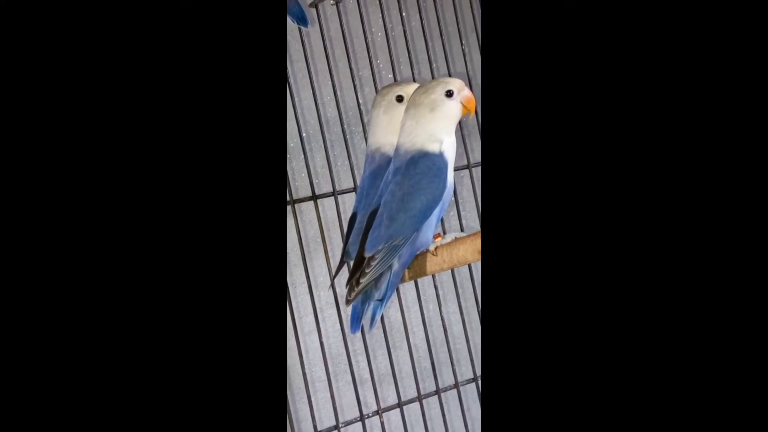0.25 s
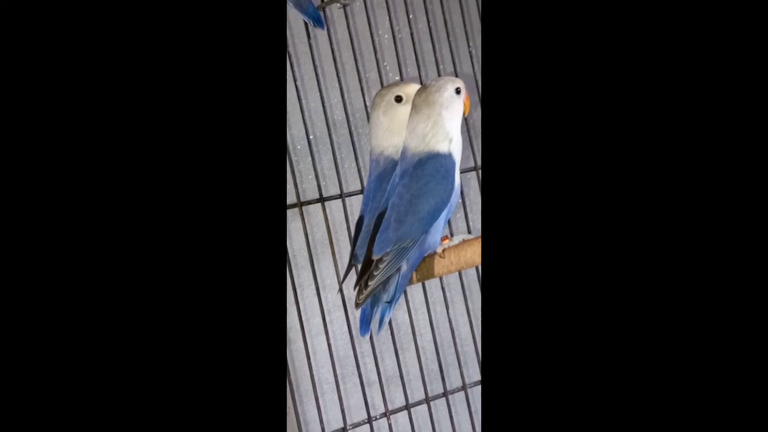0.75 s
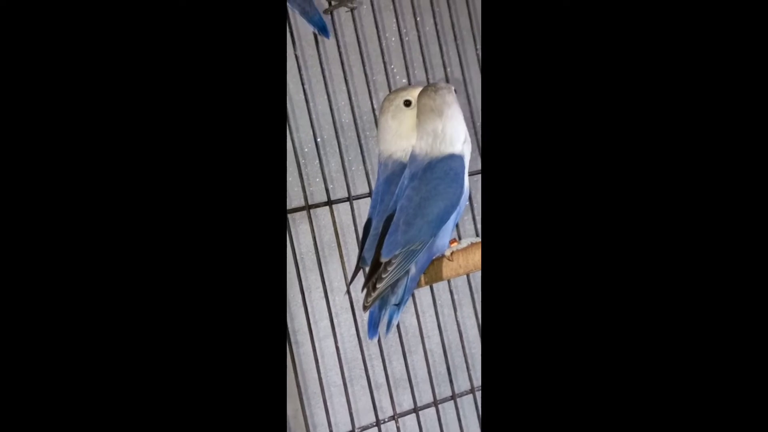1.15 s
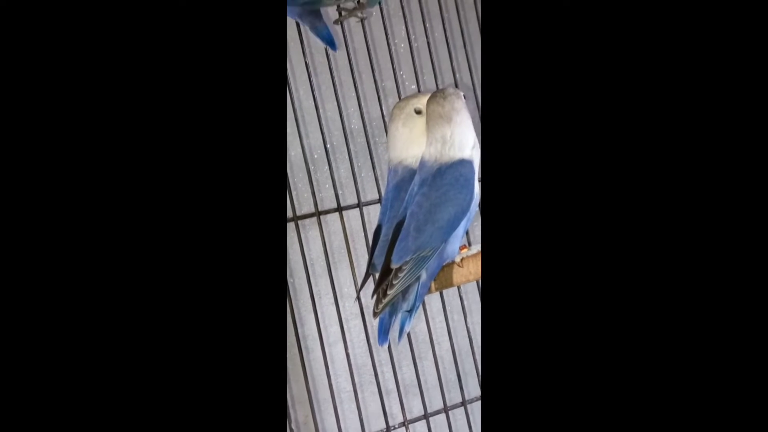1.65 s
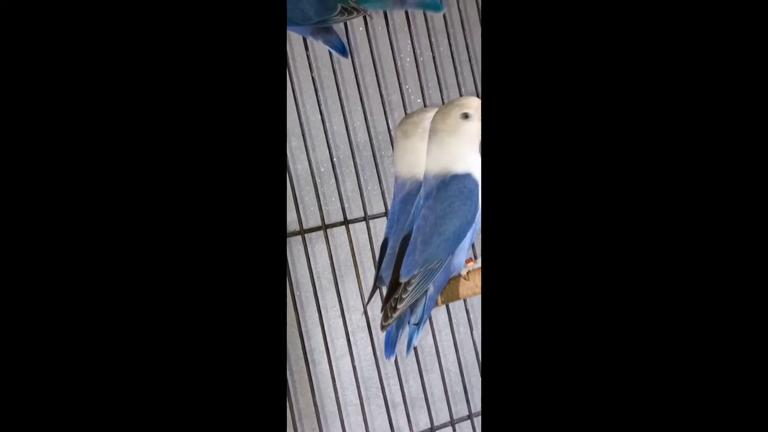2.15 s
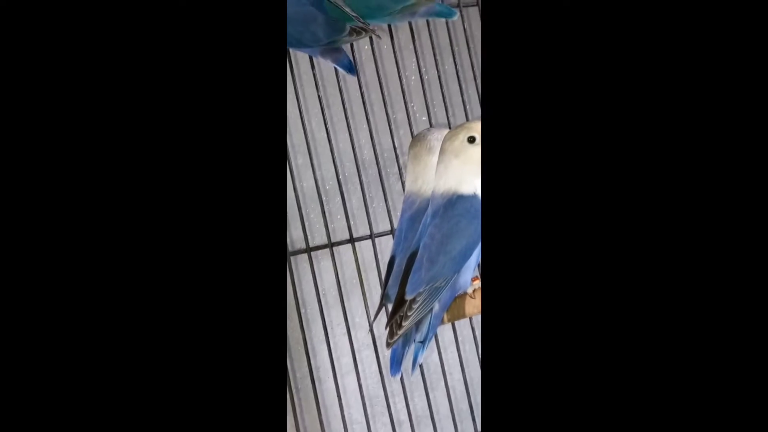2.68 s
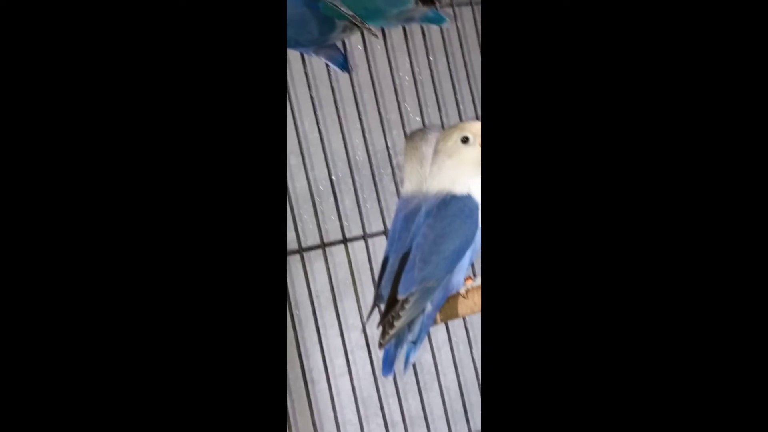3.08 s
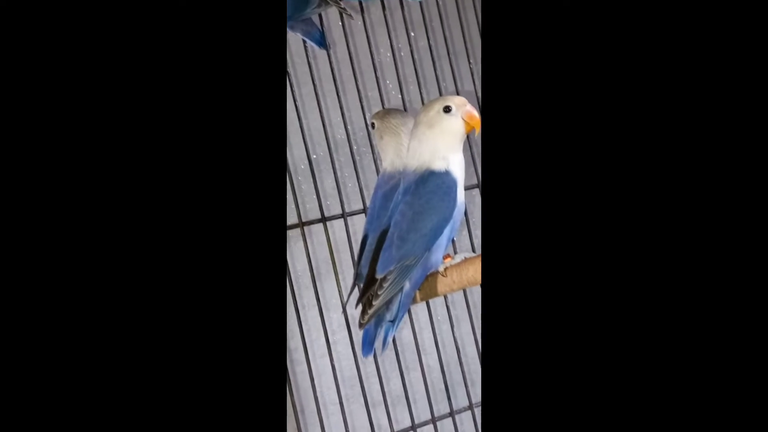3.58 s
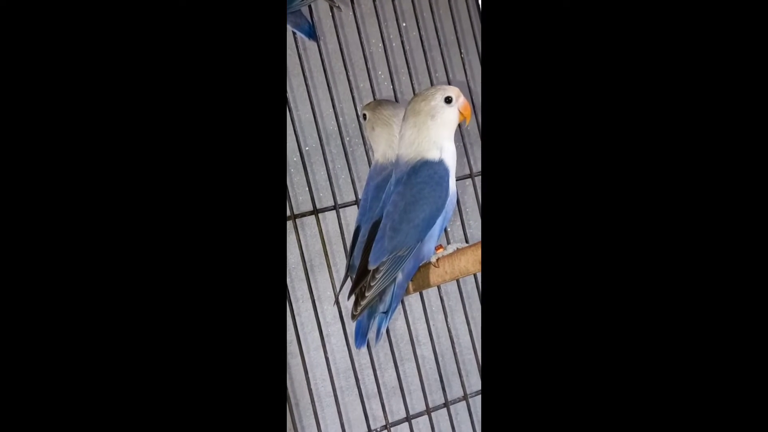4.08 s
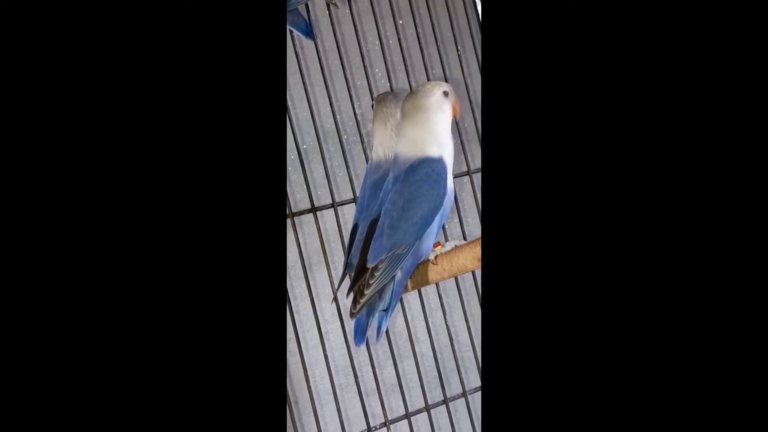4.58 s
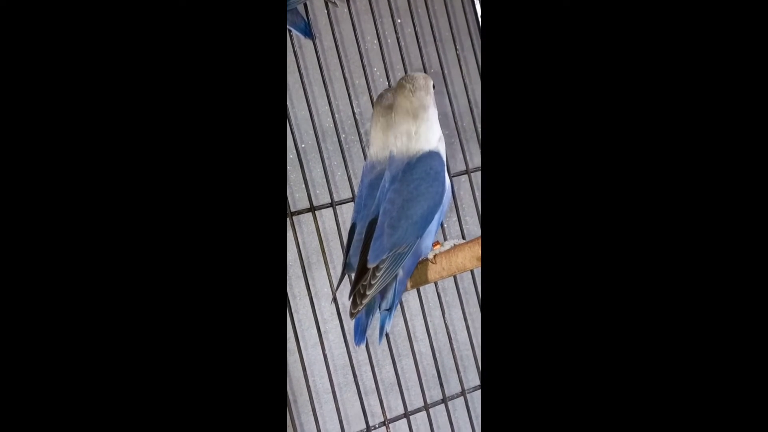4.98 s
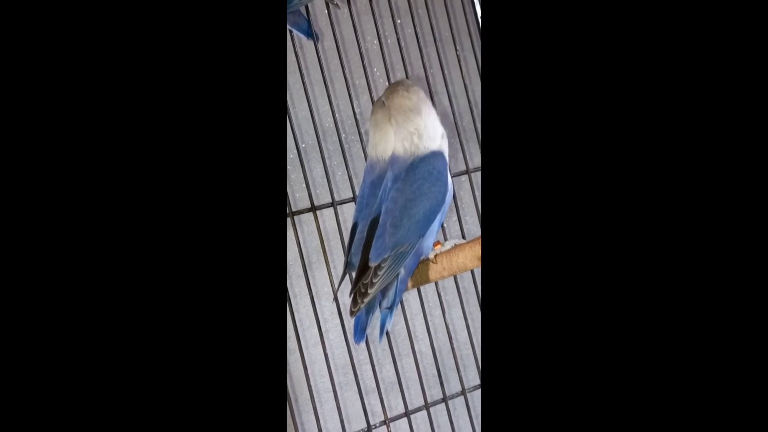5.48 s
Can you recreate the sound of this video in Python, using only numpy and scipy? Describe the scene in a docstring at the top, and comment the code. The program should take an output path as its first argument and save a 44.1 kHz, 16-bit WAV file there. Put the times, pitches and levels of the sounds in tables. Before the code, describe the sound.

Heard close up in a small, slightly echoing room, caged lovebirds let out a few separate piercing chirps. Then wings flap and claws click on the ringing wire while the birds squawk. They move into a rapid stream of high, raspy syllables dotted with whistled squeaks, which grows a little quieter near the end. A faint low hum lies underneath.

```python
"""A small hard room, close to a wire cage of lovebirds.
Three sharp chirps, squawks amid fluttering wings and claws on the bars, then a fast chatter that
turns harsh and eases off. A bird's voice box buzzes, mostly near 2.2 kHz, and its beak and windpipe
shape the tone; in a chirp the voice flips up into a piercing whistle. Tapped wires ring, feathers
rustle, wings push air, and the walls echo over a faint hum."""
import sys
import numpy as np
from scipy import signal
from scipy.fft import rfft, irfft, next_fast_len
from scipy.io import wavfile

SR = 44100
rng = np.random.default_rng(int(sys.argv[2]) if len(sys.argv) > 2 else 0)


def put_to_file(sound):
    """Save the sound as 16-bit audio at rate SR, in the file named by the first command-line argument."""
    columns = np.atleast_2d(sound).T  # one column per channel
    safe = np.clip(columns, -1, 1)
    whole_steps = np.round(safe * 32767)
    wavfile.write(sys.argv[1], SR, whole_steps.astype(np.int16))


N = 252693
TOP_HZ = 15550  # upper limit of the sound

# Levels are relative. Pan is left minus right. Roughness 0 is a clean tone, near 1 a harsh one.
# syllables of the chatter: (time [s], length [s], level [dB], pitch [Hz], brightness [dB], pan [dB])
SYLLABLES = [(3.388, 0.038, -26.5, 2127, -11, -1), (3.466, 0.029, -23, 2128, -8.5, -7),
             (3.546, 0.028, -16, 2349, -10, -1), (3.621, 0.032, -24.5, 2185, -8.5, 2),
             (3.698, 0.049, -24.5, 2215, -11, -0.5), (3.751, 0.057, -16.5, 2073, -10.5, -6),
             (3.817, 0.07, -18, 2159, -7, -7), (3.879, 0.039, -22.5, 2138, -3, -1),
             (3.93, 0.063, -18.5, 2178, -6, -3.5), (4.011, 0.047, -17, 2210, -5.5, -1.5),
             (4.088, 0.072, -19, 2144, -8.5, -5.5), (4.174, 0.041, -21, 2212, -6.5, -4),
             (4.222, 0.027, -18, 2108, -10, -4), (4.26, 0.028, -21, 2268, -7.5, -4),
             (4.293, 0.029, -20.5, 2057, -6.5, 2), (4.342, 0.049, -24, 2150, -9, -4),
             (4.388, 0.043, -19.5, 2170, -9, -3), (4.452, 0.062, -20, 2207, -8.5, -6),
             (4.548, 0.037, -17, 2233, -11, -11), (4.578, 0.058, -18.5, 2220, -11.5, -21),
             (4.654, 0.032, -20.5, 2159, -8.5, -8), (4.692, 0.028, -24, 2860, -3, -7),
             (4.74, 0.029, -22, 2090, -9.5, -1), (4.793, 0.033, -24.5, 2190, -9, -5),
             (4.828, 0.0485, -25.5, 2263, -10.5, -7), (4.881, 0.03, -27.5, 2220, -5, -6),
             (4.925, 0.048, -23.5, 2283, -9.5, -2), (4.982, 0.035, -27, 2198, -14, -2),
             (5.052, 0.05, -25, 2323, -11.5, -3), (5.143, 0.035, -26.5, 2265, -8, 0),
             (5.197, 0.061, -25, 2190, -8.5, 2), (5.269, 0.026, -27, 2257, -11, -6),
             (5.301, 0.036, -23.5, 2300, -6, -1), (5.351, 0.027, -26, 2244, -15, -7),
             (5.399, 0.037, -22, 2260, -7.5, -7), (5.544, 0.063, -26, 2306, -11.5, -5),
             (5.637, 0.015, -46, 2340, -30, -9), (5.669, 0.018, -37.5, 1835, -32, 1)]
# the chatter's changing tone: (time [s], roughness, beak resonance [Hz], lowest harmonic [dB])
CHATTER_TONE = [(3.4, 0.41, 5100, -5), (3.549, 0.42, 7050, -9), (3.69, 0.48, 6700, -8),
                (3.754, 0.61, 4300, -15), (3.88, 0.67, 5100, -11.5), (4.62, 0.64, 4830, -13),
                (4.791, 0.56, 4750, -10.5), (4.849, 0.31, 6700, -8.5), (5.0, 0.33, 4030, -12),
                (5.22, 0.7, 3800, -13.5), (5.34, 0.45, 4900, -14), (5.57, 0.7, 4270, -10.5)]
# single squawks: (time [s], length [s], level [dB], pitch [Hz], roughness, brightness [dB],
# lowest harmonic [dB], beak resonance [Hz], pan [dB])
SQUAWKS = [(0.347, 0.011, -23, 1983, 0.61, -5.5, -7, 4300, 5),
           (1.026, 0.019, -24.5, 2120, 0.66, 6, -4.5, 4600, 1.5),
           (1.047, 0.028, -29.5, 2654, 0.94, -12, -10, 5300, -7),
           (1.278, 0.065, -36, 3550, 0.78, 4, 9.5, 7000, -3.5),
           (1.326, 0.027, -28.5, 2090, 0.85, -8, -7, 4900, -4.5),
           (2.424, 0.018, -24, 2368, 0.59, -9.5, -8.5, 7200, -5),
           (2.439, 0.033, -28, 2420, 0.88, -5, 0.5, 4640, -5),
           (2.608, 0.05, -34, 2270, 0.93, -9, -2.5, 4500, -3),
           (2.68, 0.026, -25.5, 2360, 1.17, -6.5, -1.5, 4270, -3),
           (2.825, 0.052, -25.5, 2794, 0.62, -6.5, -3.5, 5460, 1),
           (2.928, 0.0743, -29, 2826, 0.79, -5.5, 3, 5400, -5),
           (3.022, 0.041, -21, 3350, 0.76, -4, 5, 5400, -4),
           (3.094, 0.032, -21.5, 3500, 0.75, -2, 5.5, 6150, -5),
           (3.292, 0.031, -27, 2570, 0.65, -15.5, -8.5, 5300, -14)]
# whistled chirps, and brief squeaky peaks within the chatter: (time [s], length [s], level [dB],
# pitch [Hz], glide [octaves], roughness, overtone [dB], pan [dB], echo [dB])
CHIRPS_AND_SQUEAKS = [(0.3539, 0.0062, -11, 4310, 0.084, 0.17, -13.5, -12, -10),
                      (0.356, 0.012, -19, 5940, 0.04, 0.21, -4.5, -6, -3.5),
                      (0.3632, 0.013, -14, 5550, -0.17, 0.3, -11, -10, -10),
                      (1.0354, 0.0075, -17, 4660, 0.07, 0.42, -19, -10, 0.5),
                      (1.04, 0.033, -20.5, 6300, -0.0035, 0.3, -8.5, -1.5, -2.5),
                      (1.339, 0.038, -18, 6400, 0.084, 0.5, 0.5, -10, -8.5),
                      (2.831, 0.018, -30, 5590, 0.13, 0.1, -22, -4, 4),
                      (2.95, 0.013, -20.5, 5910, -0.124, 0.16, -19, -2, -3.5),
                      (2.971, 0.0152, -24, 5760, 0.04, 0.25, -26, -4, -0.5),
                      (3.162, 0.0263, -20, 6090, -0.16, 0.68, -10, 2, -0.5),
                      (3.168, 0.016, -18, 5065, 0.25, 0.2, -12, -2, 4.5),
                      (3.224, 0.033, -19.5, 5890, 0.1, 0.8, -16.5, -1, -0.5),
                      (3.93, 0.0142, -15, 4760, 0.14, 0.45, -17, -10, -10),
                      (4.043, 0.0078, -17, 4970, 0.27, 0.5, -21, -15, -14),
                      (4.046, 0.0154, -20.5, 6550, 0.031, 0.01, -8, 17, 1),
                      (4.181, 0.017, -18.5, 4800, -0.026, 0.5, -28, -22, -8),
                      (4.264, 0.0073, -14, 4810, -0.062, 0.06, -21, -21, -3),
                      (4.304, 0.0085, -13, 5030, 0.17, 0.4, -26, -22, -8),
                      (4.309, 0.03, -21.5, 6670, 0.01, 0.1, -9, 20, -2),
                      (4.832, 0.017, -15, 4530, 0.057, 0, -38, -8, -9),
                      (4.859, 0.019, -18.5, 4510, -0.014, 0, -44, -20, -1.5),
                      (4.923, 0.016, -24.5, 4480, -0.0061, 0.25, -32, -7, -11),
                      (4.951, 0.02, -21.5, 4560, -0.019, 0, -32, -22, -8),
                      (5.016, 0.0068, -23.5, 4480, -0.016, 0, -24, -11, -18),
                      (5.213, 0.015, -20.5, 4470, 0.018, 0.08, -16, -21, -6),
                      (5.232, 0.009, -19, 4457, -0.11, 0.24, -22, -21, -1),
                      (5.302, 0.0127, -21.5, 4480, 0, 0.12, -30, -12, 3),
                      (5.325, 0.01, -15.5, 4527, -0.03, 0.1, -38, -11, -2),
                      (5.416, 0.05, -21, 5560, -0.126, 1.08, -21, -6, -2.5),
                      (5.569, 0.013, -22.5, 4610, -0.13, 0.44, -32, -15, 2.5)]
# how beak and windpipe filter the voice: (frequency [Hz], gain [dB])
THROAT_SHAPE = [(700, -64.5), (1300, -23), (1700, -26), (2150, -35.5), (2600, -11), (3300, -7),
                (4400, -8.5), (5500, -2), (6700, -18.5), (7500, -18.5), (8600, -18), (9600, -25),
                (12000, 3.5), (15000, -17.5)]
# resonances of the windpipe: (frequency [Hz], width [Hz], gain [dB])
WINDPIPE_PEAKS = [(2135, 315, 16), (4140, 78, 2.5), (6470, 165, 2.5), (9930, 1080, 16.5), (13000, 820, 0),
                  (14200, 380, -5.5)]
# narrow resonances at the top of the voice: (frequency [Hz], width [Hz], level [dB])
SHRILL_PEAKS = [(9820, 330, -1.5), (11970, 300, 0), (14120, 330, -4.5)]
# low puffs of air with a few of the chirps: (time [s], length [s], level [dB], pan [dB])
PUFFS = [(1.034, 0.056, -37.5, 15), (4.043, 0.0365, -34, 26), (4.303, 0.0385, -30, 31),
         (5.42, 0.043, -48.5, 20)]
# claws and beaks hitting the bars: (time [s], level [dB])
TAPS = [(0.187, -42), (0.203, -48.5), (1.724, -40.5), (2.041, -42), (2.424, -35), (2.571, -29.5),
        (2.679, -29), (2.801, -25), (2.861, -23.5), (2.892, -33), (2.928, -23.5), (3.032, -23)]
# ringing tones of the wire: (frequency [Hz], width [Hz], level [dB])
WIRE_TONES = [(2744, 650, -4), (4200, 500, -1.5), (5140, 310, -5), (6000, 380, -11.5), (10950, 490, -7.5),
              (12700, 1500, -21)]
# strokes of preening: (time [s], length [s], level [dB])
PREEN_STROKES = [(0.18, 0.056, -47.5), (0.318, 0.035, -54), (1.794, 0.056, -56.5), (1.899, 0.034, -67),
                 (1.997, 0.084, -60), (2.204, 0.053, -62), (2.252, 0.055, -59.5)]
# the birds shuffle, flap and settle: (time [s], stirred air [dB], feather rustle [dB])
MOVEMENT = [(0, -45.5, -59.5), (0.32, -47, -56.5), (0.5, -45.5, -52.5), (0.9, -56, -75),
            (1.401, -50.5, -67.5), (1.678, -59, -67.5), (1.799, -51.5, -51), (2.36, -45, -59),
            (2.581, -41, -50.5), (2.8, -38.5, -41.5), (3.05, -33, -47.5), (3.45, -41.5, -48),
            (4.001, -50, -50.5), (5.73, -55, -60)]
# rustling feathers: (frequency [Hz], level [dB])
FEATHER_SPECTRUM = [(600, -2), (1500, 1.5), (3000, -4), (5000, -5.5), (8000, -15.5), (11500, -6.5),
                    (15000, -12)]
# air stirred by wings: (frequency [Hz], level [dB])
AIR_SPECTRUM = [(15, -77), (25, -50), (60, -2), (97, -10), (124, 5.5), (155, -9), (182, 4.5), (296, -8.5),
                (525, -8), (694, -18.5), (1600, -35), (2080, -51), (3520, -120)]
# how long the room rings: (frequency [Hz], time to fade by 60 dB [s])
ROOM_DECAY = [(200, 0.19), (1500, 0.75), (4000, 0.48), (7000, 0.38), (12000, 0.3)]
# the hum of the room at rest: (frequency [Hz], level [dB])
HUM_SPECTRUM = [(15, -81.5), (25, -59.5), (49, -18), (103, -30.5), (125, -14.5), (213, -29.5), (271, 6),
                (309, -7.5), (475, -1.5), (709, -37.5), (3180, -48.5), (4260, -44), (7090, -50.5),
                (8320, -42.5), (15000, -79)]
# how the microphone's two openings colour the sound: (frequency [Hz], left minus right [dB])
MIC_BALANCE = [(100, -2), (600, 0), (2000, 3.5), (4500, 0), (5600, -2.5), (7000, 14), (9000, 4),
               (10000, 0.5), (12000, -4), (13200, 1), (14300, 3.5)]


def buzzy_call(length, hz, rough, beak_hz, low_db, bright_db, rise_s,
               jitter=0.0607, rattle_hz=150, beak_db=4, beak_width_hz=800):
    """The voice box buzzes unevenly around a clean core; beak and windpipe shape the tone."""
    t = times(length)
    arch = np.sin(np.pi * t / length) - 2 / np.pi  # the pitch rises a little, then falls
    clean_phase = phase_of(hz * (1 + 0.036 * arch))
    phase = clean_phase + phase_of(hz * jitter * rough * wobble(len(t), 260))
    harmonics = range(1, int(TOP_HZ / hz) + 1)
    buzz = evened(sum(np.cos(k * phase + k * k) / (1 + (k * hz / 12000) ** 4) for k in harmonics))
    core = sum(np.cos(k * clean_phase + k * k) for k in harmonics)
    opening = 1 + np.cos(phase)  # air gets through once a cycle
    # a second vibration joins in between the first two harmonics
    growl = 0.085 * rough * wobble(len(t), 260) * np.cos(1.55 * phase) * opening
    # harsh calls hiss between the harmonics and fizz on top
    hiss = colour(wobble(len(t), SR) * opening,
                  lambda f: 20 * np.log10(rough ** 3 + rough / (1 + (8500 / (f + 100)) ** 8)))
    # they also break into an uneven rattle
    rattle = np.sin(phase_of(rattle_hz * (1 + 0.3 * wobble(len(t), 170))))
    bursts = np.exp(rough * (0.8 * np.tanh(wobble(len(t), 590)) + 0.3 * rattle))
    source = (buzz + growl + hiss) * bursts + 0.5 * max(1 - rough, 0.15) * np.sqrt(bursts) * core
    voice = colour(source, lambda f: throat_db(f) + beak_db * bell(f, beak_hz, beak_width_hz))
    # split the voice into three bands and set the level of each
    low = colour(voice, lambda f: -20 * np.log10(1 + (f / (1.582 * hz)) ** 20))
    high = colour(voice, lambda f: -20 * np.log10(1 + (8300 / (f + 100)) ** 20))
    middle = voice - low - high
    ring = evened(shrill_ring(arch) * bursts)
    ring_share = np.interp(rough, [0.35, 0.75], [0.85, 0.16])  # clear calls ring more
    top = np.sqrt(1 - ring_share) * evened(high) + np.sqrt(ring_share) * ring
    voice = evened(middle) + gain_of(low_db) * evened(low) + gain_of(bright_db) * top
    return evened(voice * swell(t, rise_s, fall_s=0.006))


def throat_db(hz):
    """Beak and windpipe boost some frequencies and weaken others."""
    peaks = sum(db * bell(hz, centre, width) for centre, width, db in WINDPIPE_PEAKS)
    return look_up(THROAT_SHAPE, hz) + peaks


def shrill_ring(arch, drift=0.009, lift=0.015):
    """Air rings the top resonances, which differ a little in each call and rise as the beak opens."""
    tuning = 1 + drift * rng.standard_normal() + lift * arch
    rings = 0
    for hz, width, db in SHRILL_PEAKS:
        phase = phase_of(hz * tuning)
        noise = rng.standard_normal((2, 16384))[:, :len(arch)]
        breath = low_pass(noise, width / 2, steepness=4)
        rings += gain_of(db) * evened(breath[0] * np.cos(phase) + breath[1] * np.sin(phase))
    return evened(rings)


def chatter(echo_db=-1):
    """A quick run of buzzy syllables that drifts between soft and harsh."""
    tone_times, *columns = np.transpose(CHATTER_TONE)
    for start, length, db, hz, bright_db, pan_db in SYLLABLES:
        rough, beak_hz, low_db = (np.interp(start, tone_times, column) for column in columns)
        call = buzzy_call(length, hz, rough, beak_hz, low_db, bright_db, rise_s=0.0031)
        yield start, gain_of(db) * call, pan_db, echo_db


def squawks(echo_db=-1):
    """Single harsh calls; the longer ones swell in more slowly."""
    for start, length, db, hz, rough, bright_db, low_db, beak_hz, pan_db in SQUAWKS:
        call = buzzy_call(length, hz, rough, beak_hz, low_db, bright_db, rise_s=0.0022 + 0.09 * length)
        yield start, gain_of(db) * call, pan_db, echo_db


def chirps_and_squeaks(arch_octaves_per_s=1.8, jitter=0.092):
    """Whistled chirps and squeaky peaks in the chatter: a gliding tone with a hoarser octave above."""
    for start, length, db, hz, glide, rough, overtone_db, pan_db, echo_db in CHIRPS_AND_SQUEAKS:
        t = times(length)
        first_hz, last_hz = hz * 2 ** (np.array([-0.5, 0.5]) * glide - arch_octaves_per_s * length)
        pitch = np.interp(t / length, [0, 0.4, 1], [first_hz, hz, last_hz])
        phase = phase_of(pitch * (1 + jitter * rough * wobble(len(t), 650)))
        hiss = evened(colour(wobble(len(t), SR), throat_db))
        octave = np.sin(2 * phase + 1.3 * rough * wobble(len(t), 1600))
        voice = np.sin(phase) + gain_of(overtone_db) * octave + 0.19 * rough * hiss
        flicker = np.exp(rough * np.tanh(wobble(len(t), 300)))
        ease_s = 0.074 * length
        outline = swell(t, 0.0013 + ease_s, 0.0022 + ease_s)
        yield start, gain_of(db) * evened(voice * flicker * outline), pan_db, echo_db


def air_puff(length, from_hz=400, to_hz=46):
    """A dull push of air that sinks unsteadily in pitch."""
    t = times(length)
    pitch = from_hz * (to_hz / from_hz) ** (t / length) * (1 + 0.55 * wobble(len(t), 140))
    push = np.sin(phase_of(pitch)) + 0.14 * wobble(len(t), 960)
    return evened(push * np.sin(np.pi * t / length))


def cage_taps(ring_s=0.012, pan_db=-3, echo_db=0):
    """Claws and beaks knock on the cage and set the wire ringing."""
    t = np.arange(3000) / SR
    for start, db in TAPS:
        ring = sum(gain_of(tone_db) * wobble(len(t), width) * np.cos(2 * np.pi * hz * t)
                   for hz, width, tone_db in WIRE_TONES)
        click = 0.46 * wobble(len(t), 11000)
        yield start, gain_of(db) * (evened(ring) + click) * np.exp(-t / ring_s), pan_db, echo_db


def preening(centre_hz=12000, width_hz=2400, grain_hz=250, pan_db=-2, echo_db=-2):
    """One feather slides past another: a high, grainy swish that swells and fades."""
    for start, length, db in PREEN_STROKES:
        t = times(length)
        swish = colour(wobble(len(t), SR),
                       lambda f: look_up(FEATHER_SPECTRUM, f) - 13 * (1 - bell(f, centre_hz, width_hz)))
        grain = np.exp(0.5 * np.tanh(wobble(len(t), grain_hz)))
        yield start, gain_of(db) * evened(swish * grain * np.sin(np.pi * t / length)), pan_db, echo_db


def wings(beats_per_s=22, beat_db=0.5, flap_at_s=2.45, flap_width_s=0.25):
    """Feathers brush in uneven clumps; in a flap, each beat pushes air and feathers together."""
    t = np.arange(N) / SR
    flapping = bell(t, flap_at_s, flap_width_s)
    sway = 2 * np.sin(2 * np.pi * (1.51 * t + rng.random()))  # the beats speed up and slow down
    beat = gain_of(beat_db * flapping * np.sin(2 * np.pi * beats_per_s * t + sway))
    clumps = evened(low_pass(rng.standard_normal(N), hz=70, steepness=4))
    move_times, air_db, rustle_db = np.transpose(MOVEMENT)
    air_gain = gain_of(np.interp(t, move_times, air_db) - 2)
    rustle_gain = gain_of(np.interp(t, move_times, rustle_db) + (0.74 + 1.3 * flapping) * clumps)
    air = air_gain * stereo_noise(AIR_SPECTRUM, likeness=0.95) * pan(1.1)
    rustle = rustle_gain * stereo_noise(FEATHER_SPECTRUM, likeness=0.047) * pan(-5.5)
    return beat * (air + rustle)


def placed(sound, pan_db, bounce=0.48):
    """A sound reaches one side a little sooner, and bounces off the wall behind the cage."""
    lag = rng.integers(0, 28)  # in samples, like the delays
    straight = np.array([np.pad(sound, (lag, 128 - lag)), np.pad(sound, (18, 110))])
    delays = rng.integers(25, 100, 2)
    bounced = np.array([np.roll(side, delay) for side, delay in zip(straight, delays)])
    return pan(pan_db) * (straight + bounce * bounced) / np.hypot(1, bounce)


def room_echo(sound, gap_s=0.0059, build_s=0.0031):
    """A few early echoes off the walls, then a dense tail that rings longest in the middle range."""
    reflections = rng.standard_normal((2, SR)) * (rng.random((2, SR)) < 0.12)
    hz, t, spectrum = signal.stft(reflections, SR, nperseg=256)
    fade_out = gain_of(-60 * t / look_up(ROOM_DECAY, hz)[:, None])
    fade_in = np.clip((t - gap_s) / build_s, 0, 1)
    echoes = signal.istft(spectrum * fade_in * fade_out, SR, nperseg=256)[1]
    echoes /= np.linalg.norm(echoes, axis=1, keepdims=True)
    early_at = (SR * rng.uniform(0.001, 0.022, (2, 6))).astype(int)
    echoes[[[0], [1]], early_at] += 0.1 * np.sign(rng.standard_normal(early_at.shape))
    return signal.fftconvolve(sound[None], echoes, axes=1)[:, :N]


def room_hum(level_db=-57):
    """The room at rest: a faint, low, steady noise."""
    return gain_of(level_db) * stereo_noise(HUM_SPECTRUM, likeness=0.69) * pan(9.5)


def gain_of(db):
    """Turns decibels into a multiplier."""
    return 10 ** (np.asarray(db) / 20)


def evened(x):
    """Scales a signal to an average power of 1."""
    return x / np.sqrt(np.mean(x ** 2) + 1e-20)


def times(length):
    """The time of each sample, in seconds."""
    return np.arange(int(length * SR)) / SR


def phase_of(hz):
    """The running angle of a wave whose pitch changes."""
    return 2 * np.pi * np.cumsum(hz) / SR


def bell(x, centre, width):
    """A smooth bump of height 1."""
    return np.exp(-((x - centre) / width) ** 2)


def swell(t, rise_s, fall_s):
    """Fades a call in and out."""
    return np.sin(np.pi / 2 * np.clip(t / rise_s, 0, 1) * np.clip((t[-1] - t) / fall_s, 0, 1))


def look_up(table, hz):
    """Reads between a table's rows on a log-frequency scale."""
    f, value = np.transpose(table)
    return np.interp(np.log(hz + 1), np.log(f + 1), value)


def colour(x, db_at):
    """Filters x; db_at gives the gain in dB at each frequency."""
    size = next_fast_len(x.shape[-1] + 512)
    gains = gain_of(db_at(np.fft.rfftfreq(size, 1 / SR)))
    return irfft(rfft(x, size) * gains, size)[..., :x.shape[-1]]


def low_pass(x, hz, steepness):
    """Weakens everything above hz."""
    return colour(x, lambda f: -10 * np.log10(1 + (f / hz) ** steepness))


def wobble(count, hz):
    """Random wavering up to a given rate; at SR it is plain hiss."""
    return evened(low_pass(rng.standard_normal(16384)[:count], hz, steepness=10))


def stereo_noise(spectrum, likeness):
    """Filtered noise, partly shared by left and right."""
    shared, *own = rng.standard_normal((3, N))
    noise = np.sqrt(likeness) * shared + np.sqrt(1 - likeness) * np.array(own)
    return evened(colour(noise, lambda f: look_up(spectrum, f)))


def pan(db):
    """Left and right gains that keep the total power the same."""
    return evened(gain_of([[db / 2], [-db / 2]]))


def add(mix, start, sound):
    """Mixes a sound in at a start time in seconds."""
    part = mix[..., round(start * SR):][..., :sound.shape[-1]]
    part += sound[..., :part.shape[-1]]


def scene(perches=5):
    """Birds and cage, heard directly and off the walls; each perch has its own echo."""
    direct, to_room = np.zeros((2, N)), np.zeros((perches, N))
    sources = [(squawks, -0.5), (chatter, -2.16), (chirps_and_squeaks, 0),
               (cage_taps, -2), (preening, -2)]
    for source, direct_db in sources:
        for k, (start, sound, pan_db, echo_db) in enumerate(source()):
            add(direct, start, gain_of(direct_db) * placed(sound, pan_db))
            add(to_room[k % perches], start, gain_of(echo_db) * sound)
    for start, length, db, pan_db in PUFFS:
        add(direct, start, gain_of(db) * pan(pan_db) * air_puff(length))
    echo = sum(room_echo(sound) for sound in to_room) * pan(-5.5)
    return direct + echo + wings() + room_hum()


def record(dry, dip_hz=8300, dip_width_hz=850, dip_db=-5.5, low_cut_hz=48, high_cut_hz=14650):
    """The sound loses deep bass and highest treble, dips near 8 kHz and has its loud peaks rounded."""
    heard = colour(dry, lambda f: dip_db * np.exp(-((f - dip_hz) / dip_width_hz) ** 4)
                   - 10 * np.log10(1 + (f / high_cut_hz) ** 70 + (low_cut_hz / (f + 1)) ** 4))
    heard = colour(heard, lambda f: look_up(MIC_BALANCE, f) * np.array([[0.5], [-0.5]]))
    rounded = heard / (1 + (heard / 0.92) ** 8) ** (1 / 8)
    top_cut = signal.firwin(255, TOP_HZ, window=("kaiser", 9), fs=SR)
    return signal.oaconvolve(rounded, top_cut[None], "same")


dry = scene()
out = record(dry)
put_to_file(out)
```